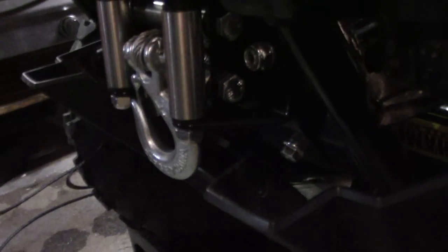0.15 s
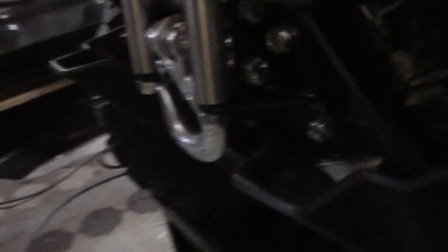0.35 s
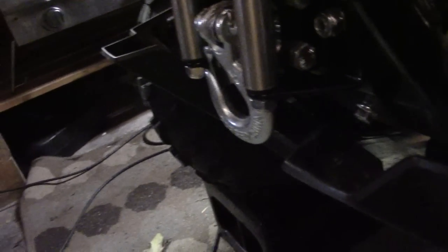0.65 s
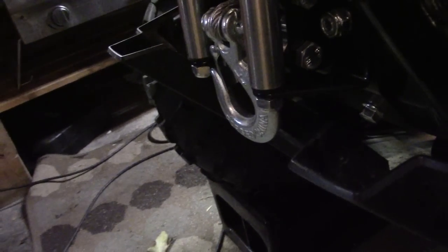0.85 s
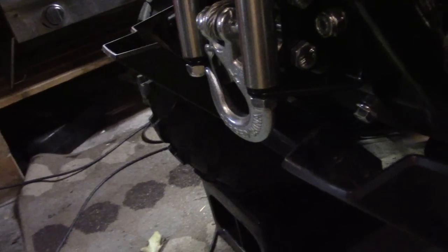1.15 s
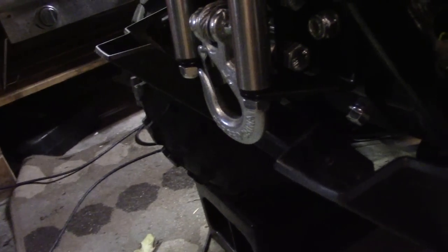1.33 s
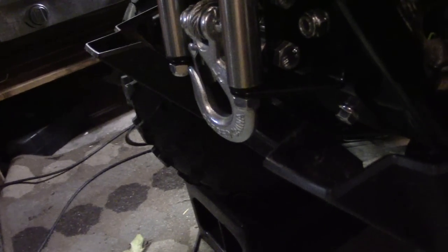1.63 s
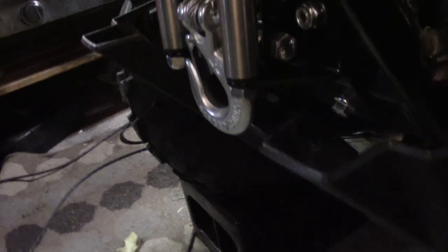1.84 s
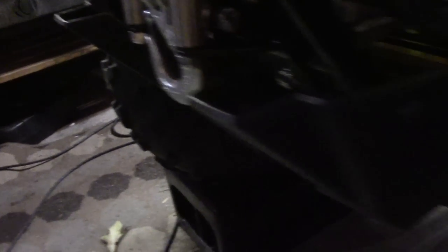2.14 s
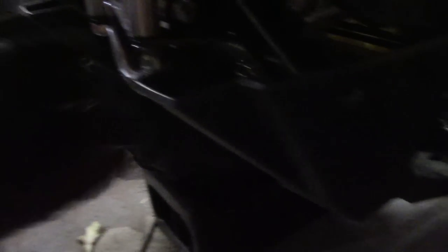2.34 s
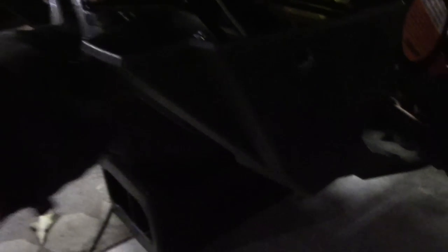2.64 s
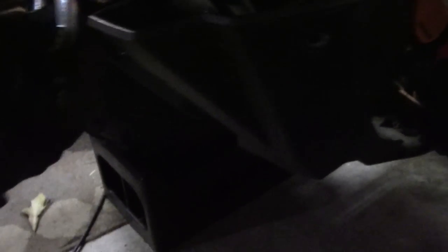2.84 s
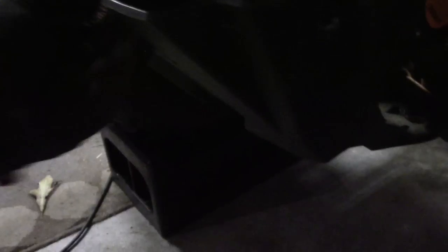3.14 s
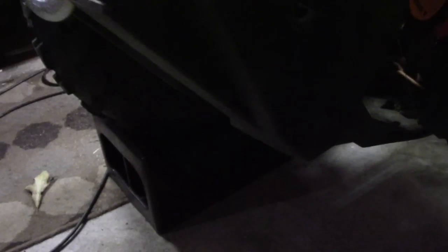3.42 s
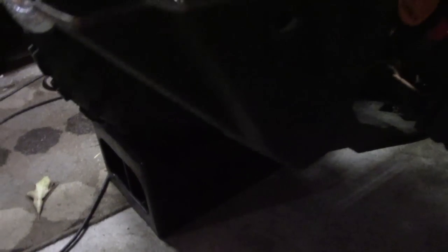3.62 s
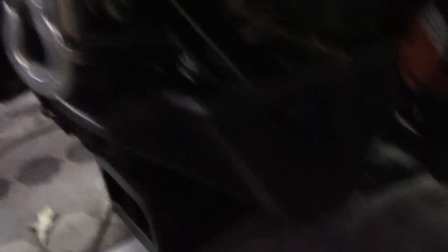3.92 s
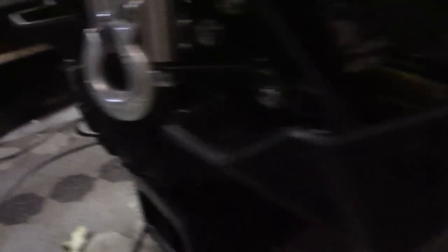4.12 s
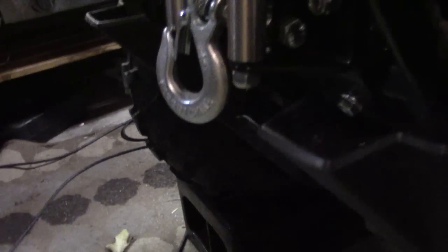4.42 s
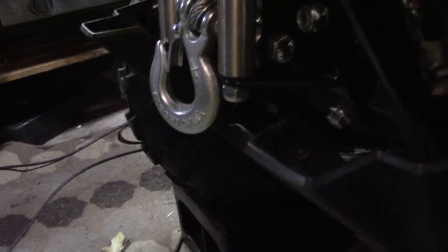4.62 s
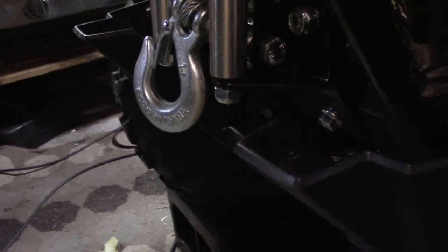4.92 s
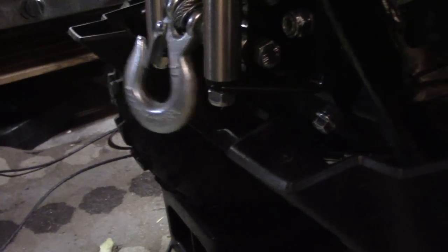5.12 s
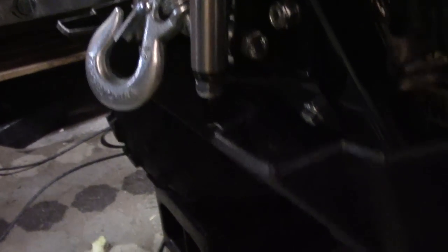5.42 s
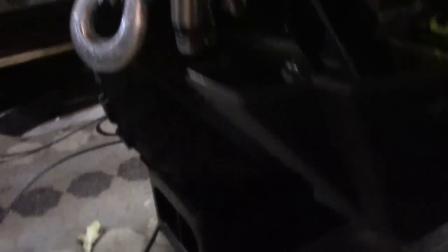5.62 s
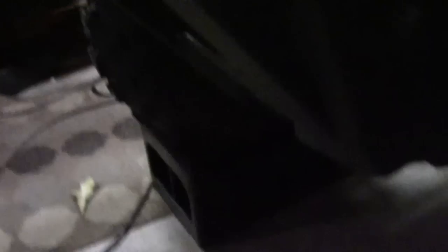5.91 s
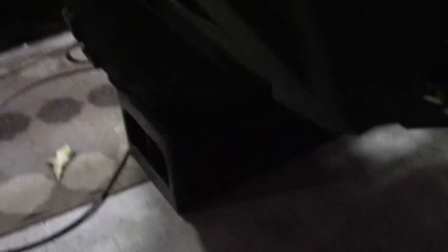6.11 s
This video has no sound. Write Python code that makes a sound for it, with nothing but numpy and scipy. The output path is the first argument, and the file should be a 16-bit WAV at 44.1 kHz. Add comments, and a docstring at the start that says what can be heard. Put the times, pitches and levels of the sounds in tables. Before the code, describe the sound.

An electric winch is jogged in four short whining, rattling bursts in a garage, with its steel hook clanking and thudding between and after them.

```python
"""Electric winch jogged in a garage

An electric winch on a parked utility vehicle is jogged four times, close to the microphone.
Each jog: switch tick, contactor clack, motor and gears spin up whining and rattling, contactor drops out.
Contacts are shaped noise bursts plus decaying modes; gears are tooth impacts and lines locked to tooth phase.
Between jogs and after the last, the steel hook clanks on the fairlead and thuds on the bumper.
Below lie low room noise and cloth rustle, both filtered noise.
"""
import sys
import numpy as np
from scipy import signal
from scipy.fft import rfft, irfft, next_fast_len
from scipy.io import wavfile
from scipy.ndimage import uniform_filter1d, minimum_filter1d

SR = 44100
rng = np.random.default_rng(int(sys.argv[2]) if len(sys.argv) > 2 else 0)


def store_wav(level_fs):
    """Save 16-bit WAV to argv[1]."""
    pcm = np.round(np.clip(np.atleast_2d(level_fs), -1, 1) * 32767)
    wavfile.write(sys.argv[1], SR, pcm.T.astype(np.int16))


N = 276060
TIME = np.arange(N) / SR
RING_TIME = TIME[:SR // 2]


def undb(db):
    """Decibels to gain."""
    return 10 ** (np.asarray(db) / 20)


def unit(x):
    """Scale to rms 1."""
    return x / np.sqrt(np.mean(x ** 2))


def unit_energy(x):
    """Scale a response so that it passes white noise at equal power."""
    return x / np.sqrt(np.sum(x ** 2))


def noise(size=N):
    """White noise."""
    return rng.standard_normal(size)


def through(x, response):
    """Pass a sound through an impulse response."""
    return signal.fftconvolve(x, response)[:len(x)]


def butter(x, hz, kind):
    """Second-order low or high pass."""
    return signal.sosfilt(signal.butter(2, hz, kind, fs=SR, output="sos"), x)


def at(points, hz):
    """Gain of a (Hz, dB) spectrum, interpolated over log frequency."""
    knots_hz, db = np.transpose(points)
    return undb(np.interp(np.log(np.maximum(hz, 1)), np.log(knots_hz), db))


def response(points, size=4096):
    """Minimum-phase impulse response with a (Hz, dB) spectrum, by folding the cepstrum."""
    cepstrum = irfft(np.log(at(points, np.fft.rfftfreq(size, 1 / SR))))
    cepstrum[1:size // 2] *= 2
    cepstrum[size // 2 + 1:] = 0
    return irfft(np.exp(rfft(cepstrum)))


def colour(x, points):
    """Give a sound a spectrum; white noise keeps its power."""
    return through(x, unit_energy(response(points)))


def walk(rate_hz):
    """Smooth random curve of rms 1 that heads for a new value rate_hz times a second."""
    hold = max(int(SR / rate_hz), 1)
    steps = np.repeat(noise(N // hold + 1), hold)[:N]
    return unit(uniform_filter1d(steps, hold))


def fade(t60_s):
    """Exponential decay, 60 dB down after t60_s."""
    return np.exp(-np.log(1000) * RING_TIME / t60_s)


def mode(hz, t60_s):
    """One decaying resonance."""
    return fade(t60_s) * np.sin(2 * np.pi * hz * RING_TIME)


def chatter(t60_s, rise_s):
    """Loose parts after a blow: dense contacts that build up and die away."""
    return fade(t60_s) * (1 - np.exp(-RING_TIME / rise_s)) * noise(len(RING_TIME))


def place(events):
    """Lay (s, dB, short sound) events on the timeline."""
    out = np.zeros(N + len(RING_TIME))
    for start_s, db, sound in events:
        start = int(start_s * SR)
        out[start:start + len(sound)] += undb(db) * sound
    return out[:N]


def blows(rows, t60_s, rise_s):
    """Each (s, dB) blow sets loose parts chattering."""
    return place((start_s, db, chatter(t60_s, rise_s)) for start_s, db in rows)


def hiss(hiss_db=-73):
    """Each microphone has its own faint hiss."""
    spectrum = [(200, 3.5), (3000, 9), (11000, -12.5), (16000, -28.5)]
    return undb(hiss_db) * np.array([colour(noise(), spectrum) for _ in "LR"])


# Room noise spectrum. Each row: frequency in Hz, density in dB per Hz.
AIR_SPECTRUM = [(15, -90.5), (25, -53.5), (58, -28.5), (87, -14.5), (108, -8.5), (180, -2.5), (217, 1.5),
                (301, -6), (489, -4), (962, -8.5), (1230, -14), (1700, -17.5), (2280, -24.5),
                (11000, -39.5), (16000, -47.5)]


def room_noise(start_db=-48.5, rise_db_per_s=0.4547, rumble_db=-75.5):
    """Restless low air noise that grows slowly, over a wavering rumble."""
    air = colour(noise(), AIR_SPECTRUM) * undb(start_db + rise_db_per_s * TIME + .5 * walk(26))
    rumble_spectrum = [(10, -7), (25, -4), (60, -5.5), (120, -13.0), (400, -53.0)]
    return air + undb(rumble_db) * colour(noise() * undb(3 * walk(8.1)), rumble_spectrum)


# Sleeve brushing near the microphone. Each row: middle in seconds, level in dB, half length in seconds.
SLEEVE_BRUSHES = [(2.282, -59.5, 0.048), (2.56, -61.5, 0.079), (2.722, -57, .025), (5.944, -61, .025),
                  (6.25, -57, .07)]


def cloth_rustle(rest_db=-79):
    """Fluttering friction noise of cloth that swells with each brush."""
    spectrum = [(500, 0), (2500, 6), (8000, 2), (13000, 0.5), (16000, -22.5)]
    cloth = colour(noise() * undb(1.8 * walk(200)), spectrum)
    brushing = sum(undb(db) * np.exp(-((TIME - middle_s) / half_s) ** 2)
                   for middle_s, db, half_s in SLEEVE_BRUSHES)
    return cloth * (undb(rest_db) + brushing)


# Modes of the hook, rollers and bracket. Each row: frequency in Hz, level in dB, t60 in seconds.
HOOK_MODES = [(418, -7, 0.37), (522, 8, 0.078), (606.3, 14, 0.31), (860, -9, 0.54), (1025, 14.5, 0.16),
              (1138, 21, 0.13), (1450, 11, 0.2), (1660, -19, 0.052), (2250, 5, 0.071), (2640, 11, 0.087),
              (3410, 12, 0.041), (4470, -4, 0.11), (5060, -12, 0.12), (5700, -16, 0.17), (7670, 2, 0.18),
              (12600, -11, 0.13)]


def hook_ring(soft, favoured_hz, scatter_db=2):
    """The contact point wakes modes near its frequency; soft contacts miss the high modes."""
    favour_db, favour_octaves = 13.5, .4
    tilt_db_per_octave, corner_hz = -10, 1990
    mode_hz, mode_db, _ = np.transpose(HOOK_MODES)
    favour = np.exp(-(np.log2(mode_hz / favoured_hz) / favour_octaves) ** 2)
    dulling_db = tilt_db_per_octave * soft * np.maximum(np.log2(mode_hz / corner_hz), 0)
    level_db = mode_db + favour_db * favour + dulling_db + scatter_db * noise(len(HOOK_MODES))
    gains = unit_energy(undb(level_db)) * rng.choice([-1, 1], len(HOOK_MODES))
    modes = [mode(hz * (1 + 0.0047 * rng.standard_normal()), t60_s) for hz, _, t60_s in HOOK_MODES]
    return np.sqrt(2) * gains @ np.array(modes)


# Clattering body. Each row: frequency in Hz, density in dB per Hz.
BODY_SPECTRUM = [(50, -51), (130, -23), (300, -3), (560, 1.5), (750, 2), (1150, -5), (1550, -4.5),
                 (1900, -10.5), (2500, -15), (4000, -26), (9000, -55.5)]
# Bumper thud. Each row: frequency in Hz, density in dB per Hz.
THUD_SPECTRUM = [(30, -58), (80, -25), (140, -2), (200, -0.5), (300, 5.5), (500, -1.5), (1000, -47),
                 (3000, -57)]
# Steel clink. Each row: frequency in Hz, density in dB per Hz.
CLINK_SPECTRUM = [(100, -49), (800, -38), (2300, 7), (3100, 1), (3900, 8.5), (4800, -1), (5900, -2),
                  (7500, -12.5), (10000, -22.5), (16000, -42)]
# Snap of first contact. Each row: frequency in Hz, density in dB per Hz.
SNAP_SPECTRUM = [(200, -44), (1500, -23), (4000, 0), (6000, 6.5), (8500, -9), (12000, -6), (16000, -24)]


def knock(hardness, favoured_hz, hum_db=-6, lift_db=6.5, lift_q=4.5):
    """Body clatter, bumper thud and hum, clink, snap and ring; soft contact trades steel for thud."""
    soft = 1 - np.clip(hardness, 0, 1)
    # dB against the body: hardest contact + change towards the softest
    thud_db, clink_db = -20 + 26 * soft, 2.5 - 34.5 * soft ** 2
    snap_db, ring_db = 5 - 70 * soft, -3.5 - 6.5 * soft
    body = colour(chatter(t60_s=0.17, rise_s=0.0013), BODY_SPECTRUM)
    hum = undb(hum_db) * mode(199, 0.29)
    thud = undb(thud_db) * (colour(chatter(t60_s=0.16, rise_s=0.0024), THUD_SPECTRUM) + hum)
    clink = undb(clink_db) * colour(chatter(t60_s=0.069, rise_s=0.0013), CLINK_SPECTRUM)
    snap = undb(snap_db) * colour(chatter(t60_s=0.026, rise_s=0.00013), SNAP_SPECTRUM)
    sound = body + thud + clink + snap + undb(ring_db) * hook_ring(soft, favoured_hz)
    peak = signal.lfilter(*signal.iirpeak(favoured_hz, lift_q, fs=SR), sound)
    return sound + (undb(lift_db) - 1) * peak


# Knocks of the swinging hook. Each row: start in seconds, level in dB,
# hardness from 0 (plastic bumper) to 1 (square on steel), frequency in Hz that the contact point favours.
HOOK_KNOCKS = [(1.7238, -21, 0.14, 150), (2.595, -44.5, 0.86, 6000), (2.609, -24.5, 0.55, 4050),
               (2.717, -38, 0.38, 260), (2.9161, -21, 0.86, 905), (2.9457, -26.5, 0.94, 5340),
               (3.049, -28, 0.45, 3930), (3.067, -35.5, 0.62, 4200), (3.094, -18.5, 0.8, 630),
               (3.111, -19.5, 0.65, 850), (3.194, -33, 0.38, 1100), (3.2286, -28, 0.83, 12600),
               (3.244, -31, 0.77, 980), (3.981, -31, 0.32, 470), (4.066, -20, 0.6, 2300),
               (4.1428, -27, 0.073, 940), (4.257, -41.5, .26, 1800), (4.345, -43, 0.17, 507),
               (5.39, -37, 0.19, 2940), (5.413, -21.5, 0.12, 2620)]


def hook():
    """The hook swings against fairlead and bumper."""
    return place((start_s, db, knock(hardness, favoured_hz))
                 for start_s, db, hardness, favoured_hz in HOOK_KNOCKS)


# Delays between the panels. Each entry: bounce time in seconds.
PANEL_BOUNCES_S = (.0013, .0023, .0037)


def bodywork(x, size=4096):
    """Short bounces between panels, as allpasses, smear each impact without colouring it."""
    delays = np.exp(-2j * np.pi * np.outer(PANEL_BOUNCES_S, np.fft.rfftfreq(size, 1 / SR)))
    allpass = np.prod((delays - .5) / (1 - .5 * delays), axis=0)
    return through(x, irfft(allpass))


def tooth_impacts(teeth, full_hz):
    """Every tooth strikes with its own force, then scrapes."""
    strikes = np.diff(np.floor(teeth), prepend=0) * undb(4 * noise())
    scrape = noise() * (0.5 + np.exp(-(teeth % 1) / 0.35)) * undb(1.93 * walk(100))
    return 0.42 * strikes * np.sqrt(SR / full_hz) + 0.86 * unit(scrape)


# Gear whine lines. Each row: multiple of the mesh rate, relative level in dB.
WHINE_LINES = [(1, -5.5), (2, 4.5), (3, -0.5), (4, -3), (5, 5.5), (6, -8), (7, -10), (8, -6), (9, -15),
               (10, -12), (12, -14.5), (14, -17), (18, -7), (21, -19), (27, -16.5)]


def gear_whine(teeth, planets_per_tooth=1 / 6):
    """Mesh harmonics; passing planets and backlash smear each line into sidebands."""
    strengths = unit_energy(undb([db for _, db in WHINE_LINES]))
    whine = 0
    for (multiple, _), strength in zip(WHINE_LINES, strengths):
        planets = 1 + .5 * np.sin(2 * np.pi * (planets_per_tooth * teeth + rng.random()))
        backlash_rad = .42 * walk(90)
        line = np.sin(2 * np.pi * (multiple * teeth + rng.random()) + backlash_rad)
        whine = whine + strength * planets * undb(3.0 * walk(45)) * line
    return whine


def frame_drone(teeth, swell, since_on_s, frame_hz=576, width_hz=24, surge_s=0.062):
    """In the surge of starting torque, twice the mesh rate sweeps through a mounting-frame resonance."""
    pole = np.exp(np.pi * (2j * frame_hz - width_hz) / SR)
    drive = swell * np.exp(4j * np.pi * teeth - since_on_s / surge_s)
    return np.imag(signal.lfilter([1 - abs(pole)], [1, -pole], drive))


def jog(on_s, off_s, full_hz, rattle_db, whine_db, drone_db,
        spin_up_s=.035, speed_lack=.33, coast_s=0.79, unload_s=0.016):
    """Motor nears full speed exponentially, unloads and slows at cut-off; returns impacts and tones."""
    since_on_s, since_off_s = np.maximum(TIME - on_s, 0), np.maximum(TIME - off_s, 0)
    mesh_hz = full_hz * (1 - speed_lack * np.exp(-since_on_s / spin_up_s)) * np.exp(-since_off_s / coast_s)
    teeth = np.cumsum(mesh_hz * (1 + .007 * walk(160))) / SR
    load = (1 - np.exp(-since_on_s / 0.0015)) * np.exp(-since_off_s / unload_s)
    # the whine needs a few turns to build
    swell = (1 - np.exp(-since_on_s / .028)) * np.exp(-since_off_s / .014)
    impacts = undb(rattle_db) * load * tooth_impacts(teeth, full_hz)
    whine = undb(whine_db) * swell * gear_whine(teeth)
    drone = np.sqrt(2) * undb(drone_db) * frame_drone(teeth, swell, since_on_s)
    return impacts, whine + drone


# Winch jogs. Each row: contactor closes in seconds, opens in seconds, full gear-mesh rate in Hz,
# rattle in dB, whine in dB, frame drone in dB, closing clack in dB, opening clack in dB.
WINCH_JOGS = [(0.792, 0.92, 315.3, -14.5, -16, -13, -6.5, -3),
              (1.3193, 1.43, 312.5, -15, -11.5, -5.5, -5.5, -5.5),
              (4.673, 4.816, 315.8, -13.5, -14, -2, -3.5, -7.5),
              (5.078, 5.198, 312.8, -12.5, -9.5, -13, -6, -5.5)]
# Gearbox and drum under rattling teeth. Each row: frequency in Hz, density in dB per Hz.
GEARBOX_SPECTRUM = [(40, -31.5), (85, -13.5), (130, -23.5), (200, -3), (310, -1.5), (380, -4.5), (580, 6.5),
                    (700, 1.5), (850, 0.5), (1100, 3.5), (1300, -1.5), (1550, 2.5), (1900, -7), (3900, -9),
                    (6500, -18), (8500, -18.5), (12000, -29), (16000, -46)]
# Ringing of the winch housing. Each row: frequency in Hz, width in Hz, level in dB.
HOUSING_MODES = [(550, 21, -0.5), (885, 110, 6.5), (1080, 83, -15.5), (1146, 45, 11), (1503, 22, 0),
                 (1600, 34, -14.5), (2329, 47, -2), (2613, 50, -8), (3830, 70, 4), (4070, 40, -25),
                 (6000, 50, 4)]
# Contactor clack. Each row: frequency in Hz, density in dB per Hz.
CONTACTOR_SPECTRUM = [(40, -25.5), (150, -4), (500, -3), (1200, -0.5), (1900, -3.5), (2600, 2.5),
                      (3200, -1.5), (4000, 2), (5200, -9.5), (8000, -8.5), (11500, -12.5), (16000, -26)]
# Thumb switch tick. Each row: frequency in Hz, density in dB per Hz.
SWITCH_SPECTRUM = [(200, -21), (900, 7), (3000, 2.5), (5500, -1), (9000, -27.5), (15000, -18)]


def winch(switch_lead_s=.0132, switch_db=-33, run_on_s=.011, ringing_db=-17.5):
    """Gear impacts and contactor clacks ring the same housing; returns clatter and tones."""
    # the motor pulls on briefly after the contactor opens
    jogs = [jog(on_s, off_s + run_on_s, *motor) for on_s, off_s, *motor, _, _ in WINCH_JOGS]
    impacts, tones = np.sum(jogs, axis=0)
    closes_s, opens_s, *_, closing_db, opening_db = np.transpose(WINCH_JOGS)
    gears = colour(bodywork(impacts), GEARBOX_SPECTRUM)
    clack_rows = [*zip(closes_s, closing_db), *zip(opens_s, opening_db)]
    clacks = blows(clack_rows, t60_s=0.064, rise_s=0.0029)
    housing = unit_energy(sum(undb(db) * np.sqrt(width_hz) * mode(hz, np.log(1000) / (np.pi * width_hz))
                              for hz, width_hz, db in HOUSING_MODES))
    ringing = undb(ringing_db) * through(impacts + clacks, housing)
    tick_rows = [(close_s - switch_lead_s, switch_db) for close_s in closes_s]
    ticks = colour(blows(tick_rows, t60_s=0.075, rise_s=0.001), SWITCH_SPECTRUM)
    return gears + ringing + colour(clacks, CONTACTOR_SPECTRUM) + ticks, tones


def garage(x, t60_bass_s=0.52, t60_low_s=0.29, t60_high_s=0.2, bass_hz=280, split_hz=4000, bass_db=2):
    """Diffuse tail of the walls; the treble dies first and the bass lingers."""
    size = len(RING_TIME)
    bass = undb(bass_db) * butter(noise(size), bass_hz, "low") * fade(t60_bass_s)
    low = butter(noise(size), split_hz, "low") * fade(t60_low_s)
    high = butter(noise(size), split_hz, "high") * fade(t60_high_s)
    walls = (bass + low + high) * (1 - np.exp(-RING_TIME / 0.015))
    return through(x, unit_energy(walls))


def near_echoes(x, echo_db=-16):
    """Floor, bumper and wheel return the sound within milliseconds and comb its spectrum."""
    lags_s = (.0019, .0031, .0052)
    return x + undb(echo_db) * sum(np.pad(x, (int(lag_s * SR), 0))[:N] for lag_s in lags_s)


# Spread between the ports. Each row: frequency in Hz, quarter-cycle side part against mid in dB.
PORT_SPREAD = [(60, -39.5), (250, -26.5), (1000, -24.5), (2000, -22), (4000, -21), (8000, -15.5),
               (14000, -16.5)]
# Balance of the ports. Each row: frequency in Hz, left minus right in dB before the side part.
PORT_LEAN = [(100, -0.32), (1500, -0.12), (4000, 0.59), (8000, -1.7), (13000, -.4)]


def ports(mid, direct=1.0, diffuse=0.63):
    """Two close microphone ports differ by a small quarter-cycle part and a short diffuse scatter."""
    size = next_fast_len(N + len(RING_TIME))
    hz, spectrum = np.fft.rfftfreq(size, 1 / SR), rfft(mid, size)
    scatter = rfft(unit_energy(noise(len(RING_TIME)) * fade(0.11)), size)
    side = at(PORT_SPREAD, hz) * (1j * direct + diffuse * scatter)
    lean = np.sqrt(at(PORT_LEAN, hz))
    return irfft(spectrum * np.array([lean + side, 1 / lean - side]), size)[:, :N]


def scene(low_cut_hz=90, comb_hz=1800):
    """Winch and hook in the garage; the deep bass below about 90 Hz is thin."""
    background = room_noise() + cloth_rustle()
    knocks = hook()
    clatter, tones = winch()
    tail = garage(undb(-16.5) * clatter + undb(-15.5) * tones + undb(-21.0) * knocks)
    sound = butter(clatter + tones + knocks + tail, low_cut_hz, "high")
    # small surfaces mirror only the treble
    treble = butter(sound, comb_hz, "high")
    return ports(sound - treble + near_echoes(treble) + background) + hiss()


def record(dry, ceiling=.85, hold_s=.003, top_hz=16000):
    """A fast limiter holds the peaks under full scale; a steep low pass cuts the top."""
    hold = int(hold_s * SR)
    needed = ceiling / np.maximum(np.abs(dry).max(axis=0), ceiling)
    gain = uniform_filter1d(minimum_filter1d(needed, 2 * hold), hold)
    return signal.sosfilt(signal.ellip(8, .2, 90, top_hz, fs=SR, output="sos"), gain * dry)


dry = scene()
out = record(dry)
store_wav(out)
```